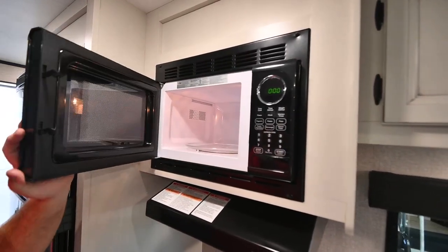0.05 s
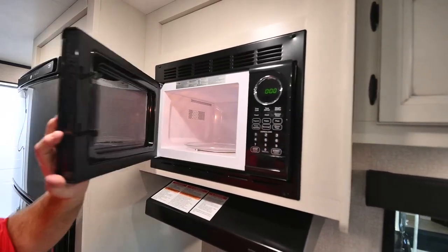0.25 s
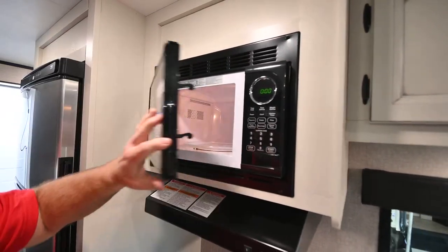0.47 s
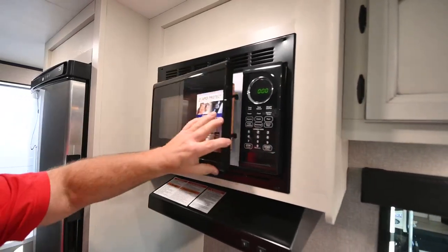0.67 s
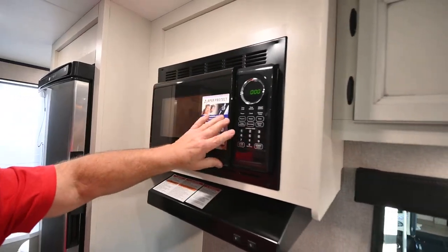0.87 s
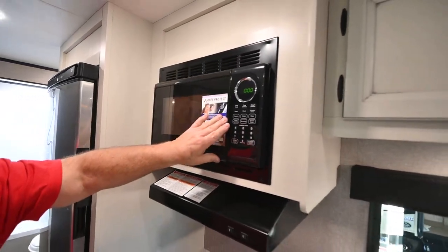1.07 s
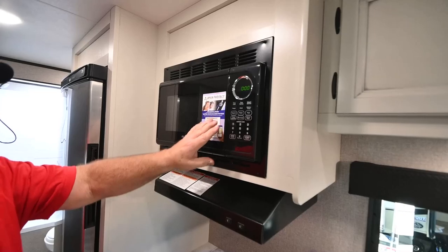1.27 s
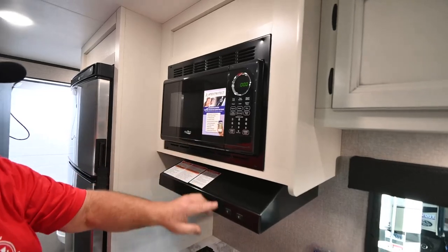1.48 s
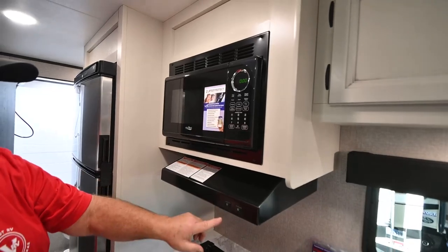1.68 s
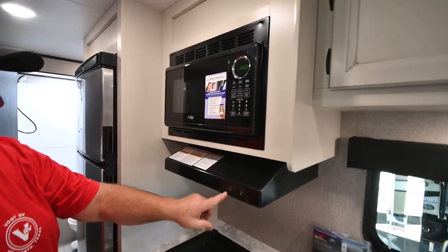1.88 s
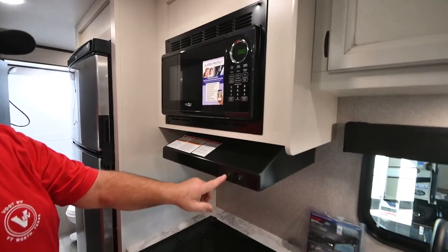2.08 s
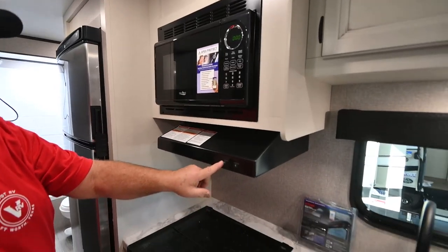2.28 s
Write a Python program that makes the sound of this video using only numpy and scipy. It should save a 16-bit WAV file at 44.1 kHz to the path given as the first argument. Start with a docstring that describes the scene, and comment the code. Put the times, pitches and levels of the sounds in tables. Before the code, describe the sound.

Microwave door closing: light plastic clack, then a loud sharp latch slam over soft ventilation hum.

```python
"""A dull rush of air and a low, wavering ventilation hum fill a small trailer kitchen; a built-in microwave
door is swung shut. The hinge scuffs, latch hooks clack onto their ramps, slide and snap home at the frame.
Case and cabinet ring on, with small ticks and bumps. Contacts, scuffs, air and diffuse tails are coloured
noise; ringing bodies are sums of decaying sines; the shutting door adds one smooth air pulse."""
import sys
import numpy as np
from scipy import signal
from scipy.fft import rfft, irfft
from scipy.io import wavfile

SR = 44100
rng = np.random.default_rng(int(sys.argv[2]) if len(sys.argv) > 2 else 0)


def master_out(mix):
    """Clip the mix to full scale and print it as 16-bit PCM to the path in sys.argv[1]."""
    frames = np.transpose(np.atleast_2d(mix))
    ceiling = np.clip(frames, -1, 1)
    pcm = np.round(ceiling * 32767).astype(np.int16)
    wavfile.write(sys.argv[1], SR, pcm)


N = 103238  # samples
SHUT_S = 1.1026  # the door meets the frame


def undb(db):
    """Decibels to gain."""
    return 10 ** (np.asarray(db) / 20)


def curve(hz, points):
    """Read (Hz, value) points on a log-frequency axis."""
    points = np.array(points, float)
    return np.interp(np.log(hz), np.log(points[:, 0]), points[:, 1])


def fade(t, t60_s):
    """Exponential decay, 60 dB down after t60_s."""
    return np.exp(-np.log(1000) * t / np.maximum(t60_s, 1e-3))


def place(x, at_s):
    """Start a sound at a given time in an empty track."""
    return np.concatenate([np.zeros(int(at_s * SR)), x, np.zeros(N)])[:N]


def repeat(x, hits):
    """Sum copies of one sound at (start_s, gain_db) hits."""
    return sum(place(undb(gain_db) * x, start_s) for start_s, gain_db in hits)


def noise(colour, size, tilt_db=0):
    """Random-phase noise of unit RMS with a given spectrum, tilted in dB per octave above 148 Hz."""
    hz = np.maximum(np.fft.rfftfreq(size, 1 / SR), 1)
    tilt = tilt_db * np.log2(np.maximum(hz, np.exp(5)))
    phase = np.exp(2j * np.pi * rng.random(len(hz)))
    x = irfft(undb(curve(hz, colour) + tilt) * phase, size)
    return x / x.std()


def burst(colour, t60s, rise_s, tilt_db=0, size=32768):
    """Dense resonances struck together: noise in overlapping octaves, each dying at its own rate."""
    t = np.arange(size) / SR
    spectrum = rfft(noise(colour, size, tilt_db))
    octave = np.log2(np.clip(np.fft.rfftfreq(size, 1 / SR), 64, 16384))
    out = 0
    for k in range(6, 15):  # band centres 2**k Hz
        weight = np.maximum(1 - abs(octave - k), 0)
        band = irfft(spectrum * weight, size)
        out = out + band * fade(t, curve(2. ** k, t60s))
    return out * np.minimum(t / rise_s, 1)


def ring(modes):
    """Decaying sines of a struck object."""
    t = np.arange(N) / SR
    return sum(undb(db) * np.sin(2 * np.pi * hz * t) * fade(t, t60_s) for hz, db, t60_s in modes)


def ventilation():
    """Coloured-noise air rush plus a fan hum whose phase wanders slowly."""
    # air spectrum: pitch_hz, relative_db
    air_colour = [(25, -16), (50, -5), (90, 0), (140, -1), (220, -3), (400, -6.5), (650, -6.5), (1000, -5),
                  (1500, -10), (2100, -18), (2900, -29), (5000, -34), (10000, -37.5), (15500, -40)]
    air_db, hum_hz, hum_db = -57, 134.8, -65.5  # RMS levels
    t = np.arange(N) / SR
    waver = noise([(1, 0), (5, 0), (25, -40), (200, -120)], N)
    phase_rad = 2 * np.pi * hum_hz * t + .5 * waver
    hum = np.sqrt(2) * np.sin(phase_rad)
    return undb(air_db) * noise(air_colour, N) + undb(hum_db) * hum


def ticks():
    """Small plastic ticks: bright noise with an instant onset and a short decay."""
    # ticks: start_s, level_db, tilt_db_per_octave, t60_s
    tick_hits = [(.6914, -59, 1, .03), (.7593, -60, 1, .022), (1.0348, -53, -3, .01),
                 (1.0546, -62, -2, .03), (1.2151, -50, 1, .04), (1.2235, -54, 2, .04),
                 (1.2615, -56, 0, .04), (1.2935, -54, 0.5, .05), (1.3225, -59, 0, .04),
                 (1.3438, -54, 0, .055), (1.9579, -68, -1, .035)]
    # spectrum: pitch_hz, relative_db
    tick_colour = [(500, -20), (2500, -1), (4500, -2.5), (7500, -0.5), (10500, -7), (15500, -20)]
    size = 16384
    t = np.arange(size) / SR
    out = 0
    for start_s, level_db, tilt_db, t60_s in tick_hits:
        tick = noise(tick_colour, size, tilt_db) * fade(t, t60_s)
        out = out + place(undb(level_db) * tick, start_s)
    return out


def scuffs():
    """Hinge and sliding hooks rub: noise with a short linear rise and a longer decay."""
    # scuffs: start_s, level_db, rise_s, tilt_db_per_octave
    rubs = [(0.358, -60.5, .002, -4), (0.463, -52, 0.01, 2), (.652, -63.5, 0.011, 6),
            (0.685, -54.5, 0.0059, 3.5), (1.001, -46.5, 0.0031, -2), (1.0535, -45.5, 0.0015, 1),
            (1.072, -52.5, .004, 2.5)]
    # spectrum: pitch_hz, relative_db
    scuff_colour = [(150, -9), (500, 7.5), (1000, 8.5), (1700, 2.5), (2900, -8.5), (4000, -19), (8000, -28),
                    (15000, -42)]
    t60_s, size = 0.31, 16384
    t = np.arange(size) / SR
    out = 0
    for start_s, level_db, rise_s, tilt_db in rubs:
        envelope = np.minimum(t / rise_s, 1) * fade(t, t60_s)
        scuff = noise(scuff_colour, size, tilt_db) * envelope
        out = out + place(undb(level_db) * scuff, start_s)
    return out


def bumps():
    """Soft bumps of hand and door: three low, quickly damped modes."""
    # bumps: start_s, gain_db
    bump_hits = [(0.3595, -48.5), (1.003, -39.5), (1.029, -43), (1.161, -26), (2.1118, -40)]
    # modes: pitch_hz, relative_db, t60_s
    bump_modes = [(130, -18, 0.13), (373.5, -8, 0.043), (500, -1.5, 0.036)]
    return repeat(ring(bump_modes), bump_hits)


def settling():
    """The cabinet rocks in low modes and the latch spring jingles faintly in two high ones."""
    # cabinet rocking after the slam: start_s, gain_db
    thud_hits = [(1.152, -38), (1.262, -39.5)]
    # cabinet: pitch_hz, relative_db, t60_s
    cabinet_modes = [(76.7, 4, 0.15), (93, 3.5, 0.14), (288, -10, 0.23)]
    # spring settling: start_s, gain_db
    spring_hits = [(1.2151, 0), (1.2935, -4), (1.3438, -4)]
    # spring: pitch_hz, relative_db, t60_s
    spring_modes = [(4270, -57, .25), (4420, -59, .22)]
    return repeat(ring(cabinet_modes), thud_hits) + repeat(ring(spring_modes), spring_hits)


def puff():
    """The closing door pushes out one soft Gaussian pulse of air."""
    peak_db, half_width_s = -41, 0.0037  # half-width to 1/e
    u = (np.arange(N) / SR - SHUT_S) / half_width_s - 1  # peaks one half-width after SHUT_S
    return undb(peak_db) * np.exp(-u ** 2)


def hooks():
    """Plastic hooks clatter onto their ramps, set the loose door ringing, then catch at the ramp tops."""
    # ramp contacts: start_s, gain_db, tilt_db_per_octave
    contacts = [(0.858, -51, 4.5), (0.8634, -34.5, 1), (0.8686, -34.5, -0.5), (0.8738, -33.5, -2.5),
                (0.8798, -34, -1), (0.891, -38, -3.5), (.901, -42, -4)]
    # contact spectrum: pitch_hz, relative_db
    hook_colour = [(40, -41), (110, -7), (200, -8.5), (340, -5.5), (490, -3), (720, -3), (950, 6),
                   (1400, -2.5), (1750, -9.5), (2700, -13.5), (3700, -26.5), (6000, -28.5), (9000, -34.5),
                   (15500, -54)]
    # contact decay: pitch_hz, t60_s
    hook_t60 = [(100, 0.38), (500, .17), (1100, 0.024), (2500, 0.26), (10000, 0.11)]
    # loose door: pitch_hz, relative_db, t60_s
    door_modes = [(121, -42, 0.3), (188, -43, 0.35), (219, -43, 0.3), (305, -44, .27), (431, -41, 0.27),
                  (471, -36, 0.24), (544, -37, 0.17), (680, -41, 0.24), (877, -42, .22), (920, -34, 0.15),
                  (1000, -41, 0.2), (1180, -40, .12), (1226, -36, 0.16), (1370, -40, 0.16),
                  (1475, -39, 0.14), (1606, -46, .15), (2232, -47, .16), (2600, -49, 0.17),
                  (3162, -55, .17)]
    # catch: pitch_hz, level_db, t60_s
    catch_modes = [(505, -43, .1), (1020, -48, .06), (1500, -48, .08), (2620, -43, .04)]
    door_s, door_gain_db, door_rise_s = .869, -0.5, .007
    catch_s = 1.0545
    clatter = 0
    for start_s, gain_db, tilt_db in contacts:
        clack = burst(hook_colour, hook_t60, 0.00085, tilt_db, size=16384)
        clatter = clatter + place(undb(gain_db) * clack, start_s)
    rise = np.minimum(np.arange(N) / SR / door_rise_s, 1)
    door = undb(door_gain_db) * ring(door_modes) * rise
    return clatter + place(door, door_s) + place(ring(catch_modes), catch_s)


def slam():
    """The latch snaps in sharp contacts; panel thump, case modes, kitchen and cavity ring on."""
    # latch release, door on frame, rebounds: start_s, gain_db, tilt_db_per_octave
    contacts = [(1.0926, -31, -1), (1.0974, -31.5, -2), (1.1022, -18, 0), (1.1056, -16, -0.5),
                (1.1086, -24, 1), (1.1155, -25.5, 0), (1.128, -26, -3.5), (1.138, -29, -3)]
    # snap spectrum: pitch_hz, relative_db
    snap_colour = [(30, -28.5), (120, -18.5), (290, -12), (560, -1.5), (760, 1.5), (1080, -2.5),
                   (1550, -11), (2150, -5), (2700, -7.5), (3100, -19.5), (5500, -17), (8000, -10.5),
                   (11000, -18.5), (15500, -33.5)]
    # snap decay: pitch_hz, t60_s
    snap_t60 = [(100, 0.0256), (600, 0.047), (2500, 0.035), (10000, 0.018)]
    # dead thump of the door panel: pitch_hz, level_db, t60_s
    thump_modes = [(134, -18, 0.0518), (553, -22.5, 0.036)]
    # shut door and steel case: pitch_hz, relative_db, t60_s
    case_modes = [(77, -46, 0.7), (99, -37, 0.7), (126, -38, 0.7), (172, -45, 2.0), (251, -44, 0.7),
                  (291, -42, 0.85), (339, -36, 0.45), (380, -35, 0.52), (434, -33, 0.5), (470, -33, 0.3),
                  (502, -23.5, 0.23), (588, -19.5, 0.18), (676, -28.5, 0.31), (784, -36, 0.36),
                  (874, -35, 0.5), (900, -45, .8), (950, -28, .09), (1038, -28, 0.17), (1216, -28, 0.21),
                  (1350, -36.5, 0.32), (1538, -35, 0.24), (1770, -35, 0.22), (2031, -29, 0.24),
                  (2166, -36, 0.27), (2197, -36, 0.22), (2697, -36.5, 0.23), (2781, -35.5, 0.2),
                  (3539, -40.5, 0.22), (4538, -42, .1), (5245, -41, .14), (7219, -39, .11), (7676, -38, .1),
                  (8500, -38, .13)]
    # kitchen's answer: pitch_hz, relative_db
    kitchen_colour = [(30, -28), (65, -18.5), (130, -6.5), (280, -6), (520, 0), (760, -5.5), (1000, -8.5),
                      (1500, -6.5), (2100, -4), (2750, -14), (3100, -13.5), (5500, -15.5), (8000, -18),
                      (11000, -27), (15500, -37)]
    # kitchen decay: pitch_hz, t60_s
    kitchen_t60 = [(100, .33), (500, .27), (1200, .22), (3000, .25), (8000, .22), (15000, .19)]
    # long shimmer of steel cavity and latch springs: pitch_hz, relative_db
    cavity_colour = [(30, -24), (60, -12), (90, -4), (160, -2), (300, -1), (600, -6.5), (900, -4),
                     (1300, -6), (2200, -10), (3200, -22), (4400, -20), (6000, -28), (8000, -27),
                     (15000, -43)]
    # shimmer decay: pitch_hz, t60_s
    cavity_t60 = [(100, 1.3), (900, 1.3), (2200, 1.1), (5000, .9), (12000, .8)]
    case_gain_db, kitchen_gain_db, cavity_gain_db = -2, -26.5, -36.5
    snaps = 0
    for start_s, gain_db, tilt_db in contacts:
        snap = burst(snap_colour, snap_t60, 0.00039, tilt_db, size=4096)
        snaps = snaps + place(undb(gain_db) * snap, start_s)
    case = ring(thump_modes) + undb(case_gain_db) * ring(case_modes)
    kitchen = undb(kitchen_gain_db) * burst(kitchen_colour, kitchen_t60, 0.0043)
    cavity = undb(cavity_gain_db) * burst(cavity_colour, cavity_t60, 0.0077, size=65536)
    return snaps + sum(place(part, SHUT_S) for part in (case, kitchen, cavity))


def scene():
    """The door closing in the humming kitchen, in mono."""
    bass_cut_hz = 106  # thins the deep bass of the door and cabinet sounds
    door = ticks() + scuffs() + bumps() + settling() + hooks() + slam()
    door = signal.sosfilt(signal.butter(4, bass_cut_hz, "high", fs=SR, output="sos"), door)
    return (ventilation() + puff() + door)[None]


def record(dry):
    """The microphone thins the deep bass and cuts the top."""
    rumble_hz, top_hz = 48.3, 15900
    thin = signal.sosfilt(signal.butter(2, rumble_hz, "high", fs=SR, output="sos"), dry)
    return signal.sosfilt(signal.ellip(10, .2, 70, top_hz, fs=SR, output="sos"), thin)


dry = scene()
out = record(dry)
master_out(out)
```